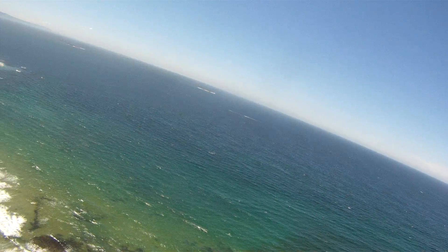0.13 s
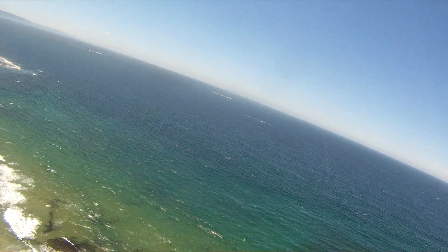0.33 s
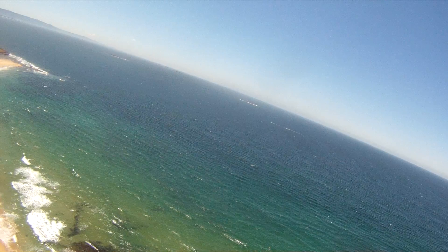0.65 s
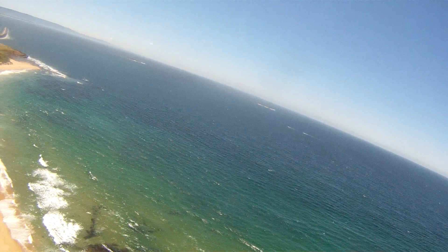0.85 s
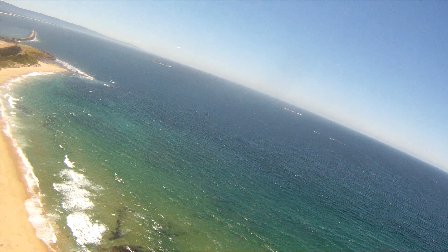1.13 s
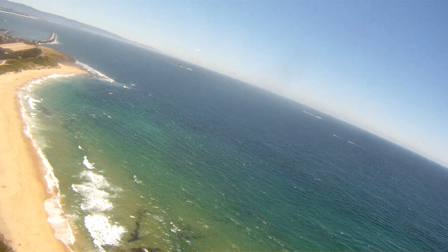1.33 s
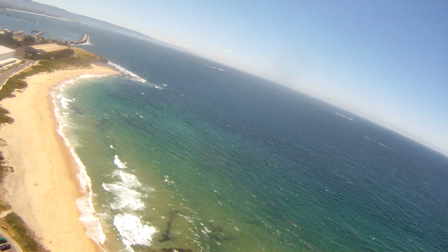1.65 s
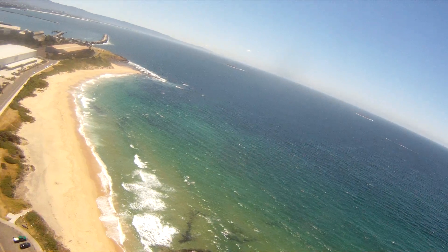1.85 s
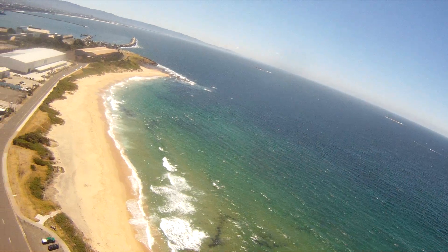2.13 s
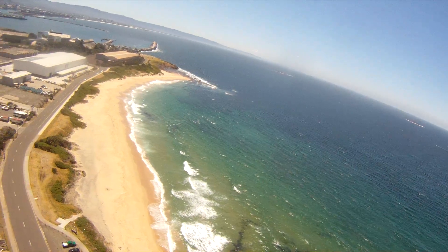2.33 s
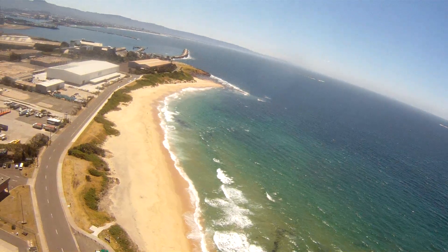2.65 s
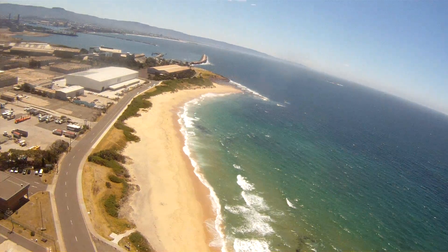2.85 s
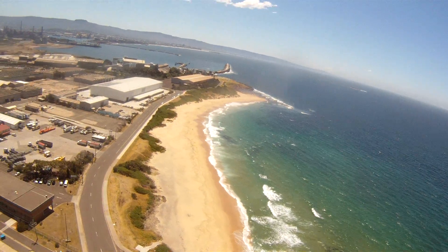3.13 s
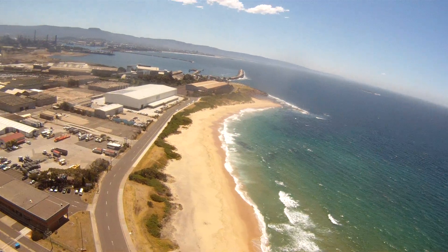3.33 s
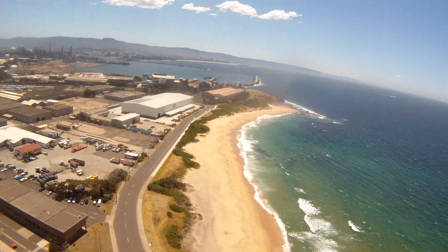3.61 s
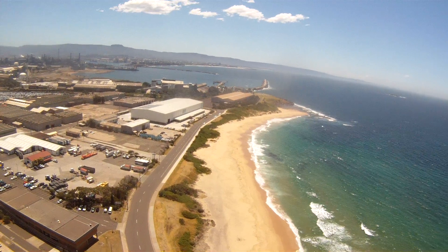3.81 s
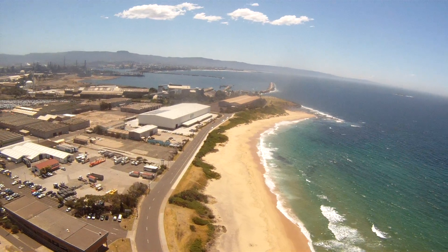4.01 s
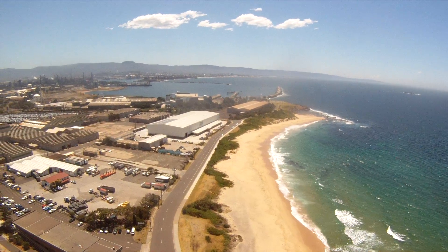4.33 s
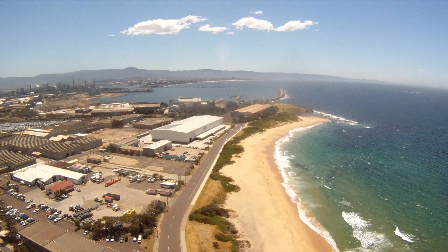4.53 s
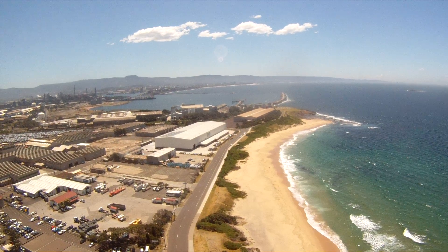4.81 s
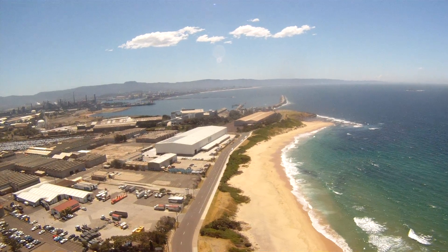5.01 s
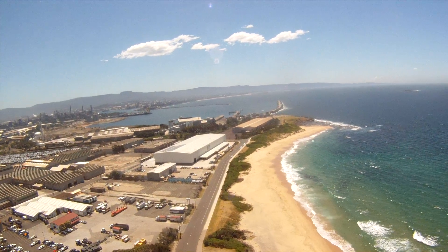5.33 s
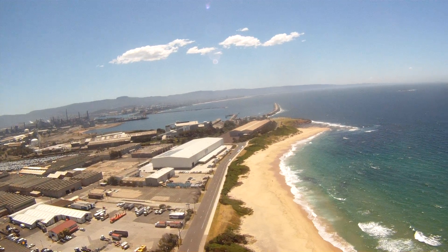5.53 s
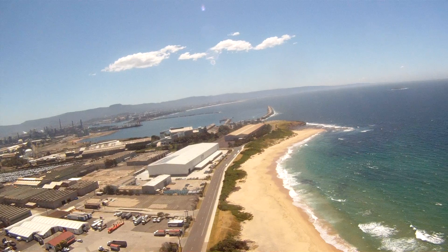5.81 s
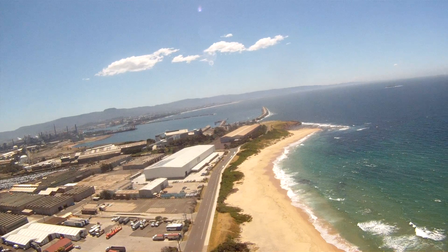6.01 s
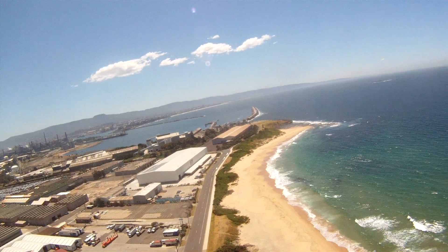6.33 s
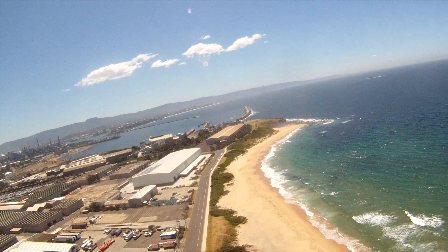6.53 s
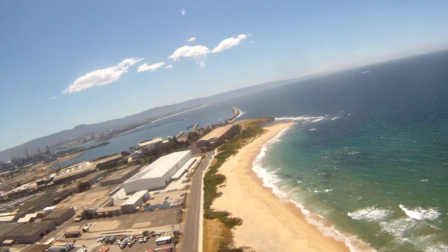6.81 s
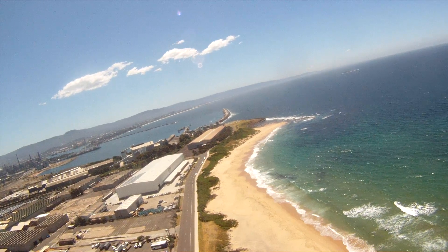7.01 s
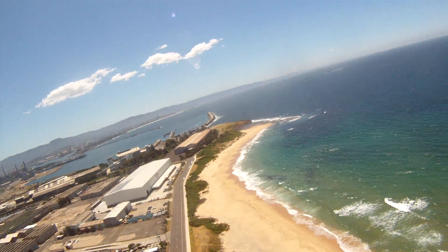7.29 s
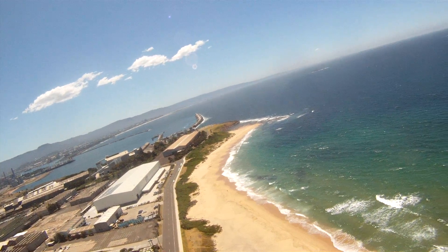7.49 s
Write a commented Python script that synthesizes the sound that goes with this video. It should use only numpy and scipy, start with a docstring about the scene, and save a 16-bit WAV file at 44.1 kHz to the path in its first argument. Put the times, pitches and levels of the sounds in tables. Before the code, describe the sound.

Wind rumbles and hisses over a microphone on a hang glider, with light knocks, metal clicks, wire twangs and a faint thin whistle.

```python
"""Gusty wind rumble and hiss, with twangs of a taut wire: a hang glider banking, heard from a small camera
on its frame. Air buffets the microphone, sheds vortices off wires and tubes, and hisses past the case,
where a cavity howls and a gap whistles for a while. The rigging wire is flicked now and then (tick,
falling chirp, fluttering twang), fittings click and the mount knocks. The camera samples slowly and
holds each sample, which mirrors the sound into the treble."""
import sys
import numpy as np
from scipy import signal
from scipy.fft import rfft, irfft, next_fast_len
from scipy.io import wavfile
from scipy.ndimage import uniform_filter1d, map_coordinates

SR = 44100
rng = np.random.default_rng(int(sys.argv[2]) if len(sys.argv) > 2 else 0)


def bounce(signal):
    """Save signal as a 16-bit WAV file at the path given by the first command-line argument."""
    frames = np.transpose(np.atleast_2d(signal))
    limited = np.clip(frames, -1, 1)
    pcm = np.round(limited * 32767).astype(np.int16)
    wavfile.write(sys.argv[1], SR, pcm)


N = 337806

# airspeed as a wire's vortex-shedding rate: (time [s], frequency [Hz])
SHEDDING = [(0, 600.7), (1.2, 594.3), (2.3, 618), (3, 655.4), (4.6, 653), (5.5, 640), (6.3, 605),
            (7.66, 592.5)]


def amp(db):
    """Decibels to gain."""
    return 10 ** (np.asarray(db) / 20)


def unit(x):
    """x at rms 1."""
    return x / np.sqrt(np.mean(np.abs(x) ** 2) + 1e-20)


def gain_at(spectrum, hz):
    """Gain from (frequency [Hz], level [dB]) points, on a log frequency axis."""
    knots_hz, db = np.transpose(spectrum)
    return amp(np.interp(np.log(hz + 1), np.log(knots_hz + 1), db))


def curve(points):
    """(time [s], value) points, interpolated per sample."""
    return np.interp(np.arange(N) / SR, *np.transpose(points))


def swell(centre_s, length_s):
    """Gaussian bump of height 1."""
    return np.exp(-(2 * (np.arange(N) / SR - centre_s) / length_s) ** 2)


def wobble(rate_hz):
    """Smooth random curve with knots at rate_hz."""
    knots = rng.standard_normal(int(N * rate_hz / SR) + 4)
    return map_coordinates(knots, [np.arange(N) * rate_hz / SR])


def filtered(x, response):
    """x through a complex frequency response."""
    size = next_fast_len(len(x) + SR // 4)
    return irfft(rfft(x, size) * response(np.fft.rfftfreq(size, 1 / SR)), size)[:len(x)]


def resonances(modes, f):
    """Causal response of (frequency [Hz], width [Hz], level [dB]) modes, signs alternating."""
    return sum((-1) ** k * amp(db) * 1j * f * width / (hz * hz - f * f + 1j * f * width)
               for k, (hz, width, db) in enumerate(modes))


def rush(spectrum, patchy_db):
    """Shaped noise at rms 1 with time-frequency patches of random gain."""
    bins = signal.stft(rng.standard_normal(N), nperseg=512)[2]
    patches = uniform_filter1d(rng.standard_normal(bins.shape), size=7, axis=0)
    patches = unit(uniform_filter1d(patches, size=8, axis=1))
    noise = signal.istft(bins * amp(patchy_db * patches), nperseg=512)[1][:N]
    return unit(filtered(noise, lambda f: gain_at(spectrum, f)))


def fuzzy_tone(pitch_hz, width_hz):
    """Narrowband noise at rms 1 around a pitch curve."""
    carrier = np.exp(2j * np.pi * np.cumsum(pitch_hz) / SR)
    return unit(np.real((wobble(width_hz) + 1j * wobble(width_hz)) * carrier))


def steadied(x, firmness, window_s=0.023):
    """x at rms 1, chance swells partly evened out."""
    power = np.abs(uniform_filter1d(x ** 2, size=int(window_s * SR)))
    return unit(x / (power + 0.037) ** (firmness / 2))


def add(track, start_s, peak_db, sound):
    """Mix a sound in at a given time and peak level."""
    part = track[max(round(start_s * SR), 0):][:len(sound)]
    part += (amp(peak_db) * sound / np.abs(sound).max())[:len(part)]


def relative_speed():
    """Airspeed about its mean, as a share of its range."""
    speed = curve(SHEDDING)
    return (speed - speed.mean()) / np.ptp(speed)


def gap_whistle(level_db=-45, start_s=2.93, end_s=5.76, attack_s=0.39, release_s=0.37):
    """Edge tone at a gap in the case: airy and an octave up at first, then a thin held whistle."""
    pitch = [(3.2, 2420), (3.37, 2400), (3.72, 2470), (4.52, 2468), (5.45, 2438)]  # (time [s], frequency [Hz])
    t = np.arange(N) / SR
    airy = amp(-61) * swell(0.5, length_s=3) * fuzzy_tone(np.full(N, 4950), width_hz=170)
    envelope = np.clip(np.minimum((t - start_s) / attack_s, (end_s - t) / release_s), 0, 1)
    pitch_hz = curve(pitch) + 6 * wobble(60) + 5 * wobble(6)  # waver and drift
    tone = np.sqrt(2) * np.sin(2 * np.pi * np.cumsum(pitch_hz) / SR)
    return airy + envelope * amp(level_db + 1.5 * wobble(25)) * tone


def cavity_howl(level_db=-37, pitch_hz=2210):
    """A cavity of the case howls hoarsely, swelling and fading about one second in."""
    return amp(level_db) * swell(0.99, length_s=1.0) * fuzzy_tone(np.full(N, pitch_hz), width_hz=170)


def case_hiss(sharp_onset_db=-41, sharp_span_db=6, flutter_db=0.93):
    """Air streams past the case; stronger flow turns sharper and sounds the cavities."""
    flow = [(0, -31), (.9, -31.5), (2, -32), (2.45, -31), (2.67, -37), (3.08, -37), (3.3, -40.5),
            (5.9, -41), (6.03, -37), (6.65, -36), (7, -37)]  # sheltered mid-turn: (time [s], level [dB])
    surges = [(5.672, .16, 7.5)]  # stream catches the case again: (time [s], length [s], lift [dB])
    soft_spectrum = [(500, -51), (850, -19), (1050, -7), (1200, 3), (1450, -4), (1750, 1.5), (2400, 1),
                     (2650, -6), (3250, -7.5), (3600, -13), (4100, -21.5), (4650, -20.5), (5450, -27.5),
                     (6000, -45.5)]  # weak flow: (frequency [Hz], level [dB])
    sharp_spectrum = [(500, -22.5), (900, -21), (1150, -5), (1420, -13), (1750, -1.5), (2150, 4.5),
                      (2400, -8), (3250, -6.5), (3520, -16.5), (3850, -12.5), (4200, -25), (4650, -14),
                      (5450, -23.5), (6000, -40.5)]  # strong flow: (frequency [Hz], level [dB])
    cavities = [(1198, 210, 6.5), (1661, 125, 8), (2500, 135, 8.5), (2775, 200, 5.5), (5000, 390, -7.5)]  # (frequency [Hz], width [Hz], lift [dB])
    flow_db = curve(flow) + sum(db * swell(s, length_s) for s, length_s, db in surges)
    sharp_share = np.clip((flow_db - sharp_onset_db) / sharp_span_db, 0, 1)
    lift = lambda f: amp(sum(db / (1 + (2 * (f - hz) / width) ** 2) for hz, width, db in cavities))
    sharp = amp(0.5) * unit(filtered(rush(sharp_spectrum, patchy_db=0.5), lift))
    soft = rush(soft_spectrum, patchy_db=1.05)
    blend = np.sqrt(sharp_share) * sharp + np.sqrt(1 - sharp_share) * soft
    return amp(flow_db + flutter_db * wobble(45)) * blend


def vortices(wire_db=-64, speed_span_db=6, diameter_ratio=7.9):
    """Shedding rate rises with airspeed: a thin wire sings, a thicker tube throbs."""
    throb_levels = [(0, -36), (1.45, -36.5), (2.1, -34.5), (3.4, -33), (4.8, -36), (5.2, -38.5),
                    (6.9, -37.5), (7.66, -46.5)]  # tube wake: (time [s], level [dB])
    wire_hz = curve(SHEDDING)
    singing = amp(wire_db + speed_span_db * relative_speed()) * fuzzy_tone(wire_hz, width_hz=55)
    throb_db = curve(throb_levels) + wobble(8)
    throb = steadied(fuzzy_tone(wire_hz / diameter_ratio, width_hz=30), firmness=0.41)
    return singing + amp(throb_db) * throb


def buffeting(drone_db=-45, speed_span_db=3.5):
    """Turbulence pushes on the microphone in gusts; the frame drones, louder at speed."""
    turbulence = [(0, -37.5), (1.3, -33.5), (2.6, -36.5), (3.3, -34), (5.2, -34.5), (5.6, -37), (7.66, -38)]  # at the microphone: (time [s], level [dB])
    gusts = [(0.425, 0.093, 8), (.84, 0.084, 4.5), (1.24, .28, 5), (1.886, 0.11, 5), (2.101, 0.14, 6)]  # (time [s], length [s], lift [dB])
    rumble_spectrum = [(8, -42), (22, -5.5), (38, 2.5), (55, -9.5), (80, -12), (103, -21.5), (125, -21.5),
                       (190, -42.5), (300, -58), (600, -60)]  # (frequency [Hz], level [dB])
    drone_spectrum = [(100, -11.5), (160, -3.5), (195, -7.5), (225, 4), (255, -7.5), (290, -14.5),
                      (340, -15.5), (390, -11.5), (490, -22.5), (800, -23), (1200, -24), (2000, -82)]  # (frequency [Hz], level [dB])
    gust_db = sum(db * swell(s, length_s) for s, length_s, db in gusts)
    rumble_gain = amp(curve(turbulence) + gust_db + wobble(36))
    rumble = steadied(rush(rumble_spectrum, patchy_db=4.5), firmness=0.86)
    drone_gain = amp(drone_db + speed_span_db * relative_speed() + 0.05 * wobble(11))
    return rumble_gain * rumble + drone_gain * rush(drone_spectrum, patchy_db=2.0)


def eddy_slaps(half_width_cycles=0.78):
    """Single eddies hit the microphone: low pressure swings, a cycle or two long."""
    eddies = [(1.281, -26, 39), (1.895, -19.5, 45), (2.029, -13.5, 83.5)]  # (time [s], peak [dB], frequency [Hz])
    out, t = np.zeros(N), np.arange(-SR // 10, SR // 10) / SR
    for s, db, hz in eddies:
        add(out, s + t[0], db, np.cos(2 * np.pi * hz * t) * np.exp(-(hz * t / half_width_cycles) ** 2))
    return out


def click(centre_hz, t60_s=0.032, width_oct=0.49, attack_s=0.00076):
    """Brief metal-on-metal chatter around centre_hz."""
    spectrum = [(300, -31), (700, -14), (1200, 0.5), (1600, 0), (2350, 0.5), (2750, -1.5), (3280, -0.5),
                (3650, -3.5), (3950, -8), (4800, -7), (5250, -3), (6000, -24)]  # (frequency [Hz], level [dB])
    t = np.arange(SR // 16) / SR
    colour = lambda f: gain_at(spectrum, f) / np.hypot(1, 2 * np.log2((f + 1) / centre_hz) / width_oct)
    noise = unit(filtered(rng.standard_normal(len(t)), colour))
    chatter = np.tanh(0.47 * noise)  # contacts of similar force
    envelope = (1 - np.exp(-t / attack_s)) * amp(-60 * t / t60_s)
    return filtered(chatter * envelope, lambda f: np.sqrt(gain_at(spectrum, f)))


def mount_rubs():
    """The camera mount slips and rubs."""
    rubs = [(1.858, 0.12, -33.5), (2.02, 0.077, -36)]  # (time [s], length [s], level [dB])
    spectrum = [(70, -22), (130, 2), (170, -6), (250, 1.5), (310, -11), (400, -12), (520, -25), (1000, -45)]  # (frequency [Hz], level [dB])
    envelope = sum(amp(db) * swell(s, length_s) for s, length_s, db in rubs)
    return envelope * steadied(rush(spectrum, patchy_db=0), firmness=0.53)


def mount_knocks(rattle_t60_s=0.055, rattle_highpass_hz=700, pad_lowpass_hz=1400):
    """Blows with a short rattle ring the mount; rubber pads dull them."""
    knocks = [(0.161, -27), (1.313, -27), (1.392, -26.5), (1.508, -24.5), (1.586, -26), (1.711, -24),
              (1.768, -21.5), (6.751, -23)]  # (time [s], peak [dB])
    modes = [(228.7, 14, 9), (390, 41, -2), (601, 35, -11.5), (1280, 420, -14.5)]  # (frequency [Hz], width [Hz], level [dB])
    out, t = np.zeros(N), np.arange(SR // 5) / SR
    highpass = lambda f: (1j * f / (rattle_highpass_hz + 1j * f)) ** 2  # too light to move low modes
    padded_mount = lambda f: resonances(modes, f) / (1 + 1j * f / pad_lowpass_hz) ** 2
    for s, db in knocks:
        rattle = 0.29 * rng.standard_normal(len(t)) * amp(-60 * t / rattle_t60_s)
        blow = (t == 0) + filtered(rattle, highpass)
        add(out, s, db, filtered(blow, padded_mount))
    return out


def fitting_clicks():
    """Loose metal fittings strike each other."""
    clicks = [(2.923, -20, 2230), (3.625, -31, 3250), (3.875, -28, 3300), (4.327, -19, 2380),
              (5.384, -32, 3200), (5.874, -20.5, 2070), (6.250, -22.5, 2660), (6.753, -22, 2360),
              (6.775, -32, 2700)]  # (time [s], peak [dB], centre [Hz])
    out = np.zeros(N)
    for s, db, hz in clicks:
        add(out, s, db, click(hz))
    return out


def rigging_wire(round_trip_s=0.0485, stiffness_hz=470, damping_hz=640, scrape_t60_s=0.069,
                 tick_hz=3200, clank_lowpass_hz=950, ping_db=6, ping_width_hz=170):
    """A flick ticks at once; its bending wave arrives treble first, then echoes along the wire."""
    flicks = [(1.931, -28, -40, -29.5, 716), (2.799, -42, -36, -27.5, 740), (3.03, -30, -35, -23.5, 760),
              (3.955, -30, -33, -22.5, 760), (4.470, -18.5, -24, -17.5, 980),
              (5.496, -23.5, -29, -23.5, 750), (6.204, -18, -26, -17.5, 990), (6.647, -18.5, -31, -25, 750)]  # (time [s], tick [dB], clank [dB], twang [dB], ping [Hz])
    frame_modes = [(146.7, 37, -4.5), (225, 35.6, 7.5), (355, 34, -12), (686, 93, -18), (978, 124, -16),
                   (1259, 177, -11.5), (1838, 480, -19)]  # (frequency [Hz], width [Hz], level [dB])
    f, t = np.fft.rfftfreq(SR, 1 / SR), np.arange(SR) / SR
    delay_s = round_trip_s / 2 / (1 + (f / stiffness_hz) ** 2) ** (1 / 4)  # short waves run faster
    one_way = np.exp(-2j * np.pi * np.cumsum(delay_s))
    reflection = 0.83 * np.exp(-(f / damping_hz) ** 2)
    # coupled mode pairs swell before they fade
    modes = [amp(db) * resonances([(hz, width, 0)], f) ** 2 for hz, width, db in frame_modes]
    twang = sum(modes) * one_way / (1 + reflection * one_way ** 2)
    clank = sum(modes[3:]) / (1 + 1j * f / clank_lowpass_hz) ** 2  # undelayed jolt on the upper modes
    out = np.zeros(N)
    for s, tick_db, clank_db, twang_db, ping_hz in flicks:
        scrape = 0.099 * rng.standard_normal(SR) * amp(-60 * t / scrape_t60_s)  # strands slipping
        rasp = rfft(scrape) * f ** 2 / (f ** 2 + damping_hz ** 2)
        ping = 1 + (amp(ping_db) - 1) * resonances([(ping_hz, ping_width_hz, 0)], f)
        add(out, s, tick_db, click(tick_hz, t60_s=0.018))
        add(out, s, clank_db, irfft(ping * clank))
        add(out, s, twang_db, irfft((1 + rasp) * ping * twang))
    return out


def scene():
    """Air and hardware at one microphone on the frame."""
    air = buffeting() + vortices() + case_hiss() + cavity_howl() + gap_whistle() + eddy_slaps()
    hardware = rigging_wire() + mount_rubs() + fitting_clicks() + mount_knocks()
    return (air + hardware)[None]


def record(dry):
    """Each slow sample is held for four fast ones: mirror images around the hold rate, band-limited."""
    hold_hz, top_hz = 12000, 15350
    baseband = filtered(dry[0], lambda f: f < hold_hz / 2)
    mirrored = baseband * (1 + 2 * np.cos(2 * np.pi * hold_hz * np.arange(N) / SR))
    droop = lambda f: np.abs(np.sinc(f / hold_hz) / np.sinc(f / hold_hz / 4))
    return filtered(mirrored, lambda f: droop(f) * (f < top_hz))[None]


dry = scene()
out = record(dry)
bounce(out)
```